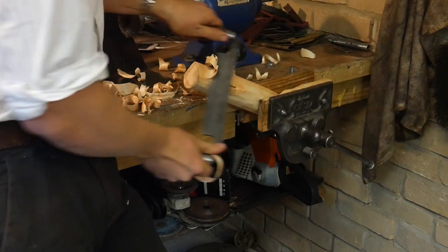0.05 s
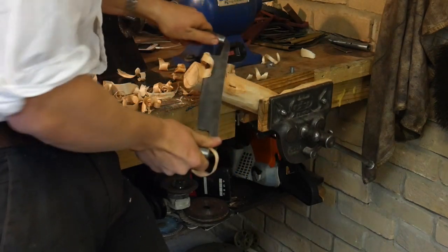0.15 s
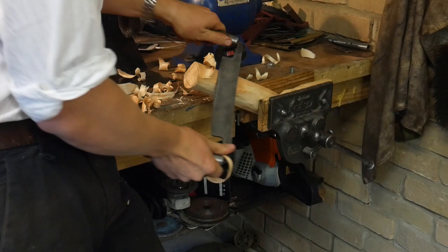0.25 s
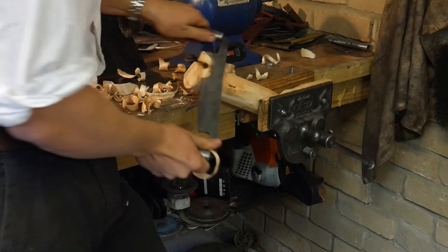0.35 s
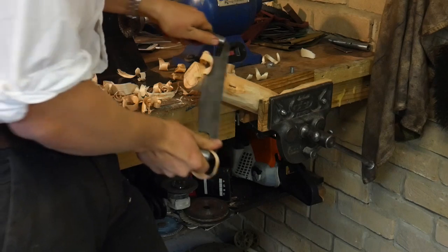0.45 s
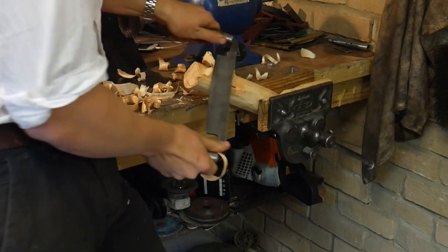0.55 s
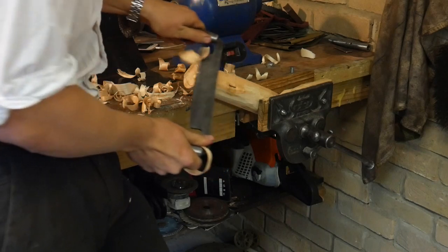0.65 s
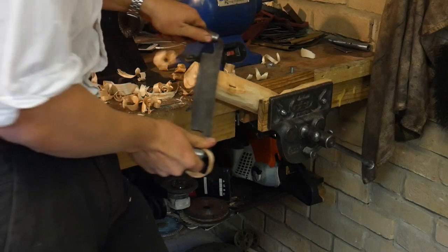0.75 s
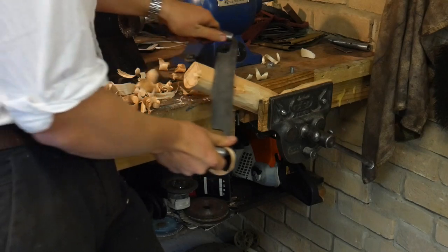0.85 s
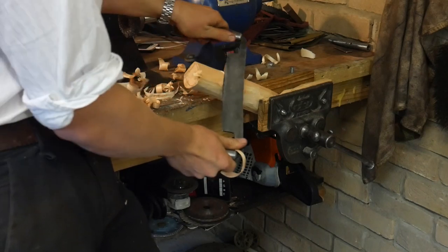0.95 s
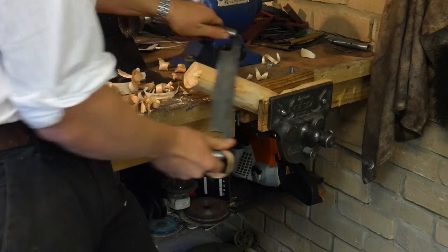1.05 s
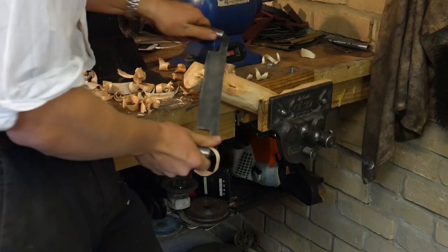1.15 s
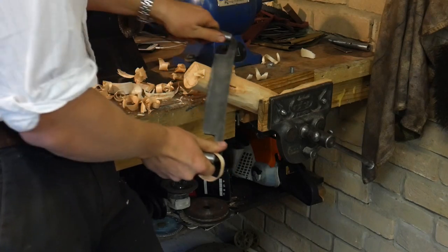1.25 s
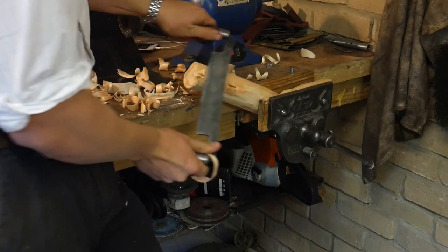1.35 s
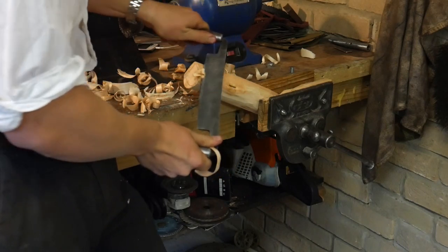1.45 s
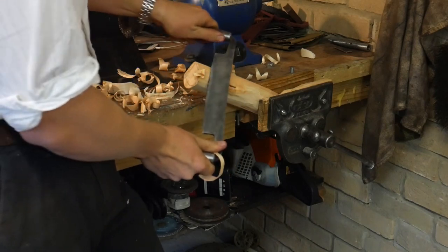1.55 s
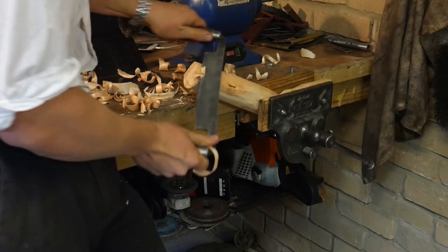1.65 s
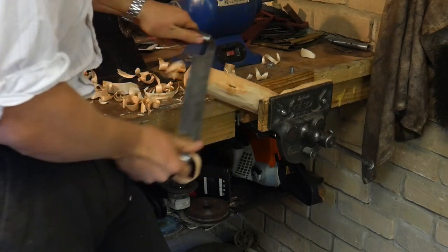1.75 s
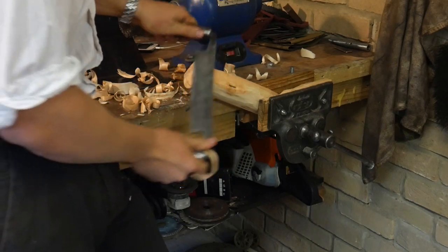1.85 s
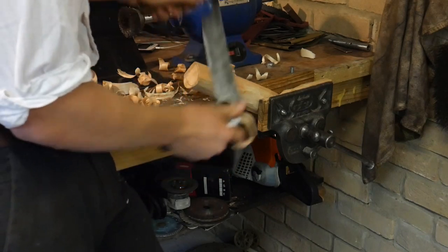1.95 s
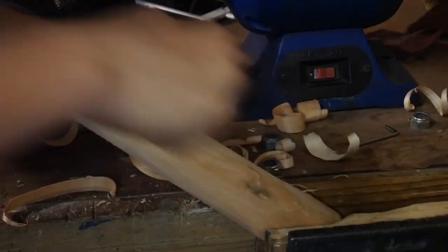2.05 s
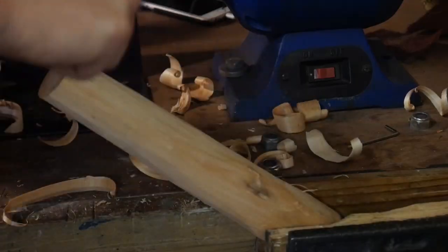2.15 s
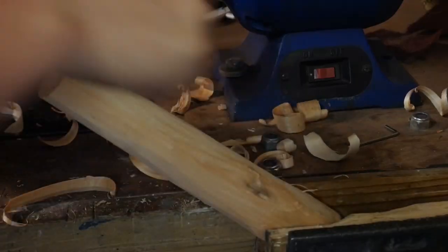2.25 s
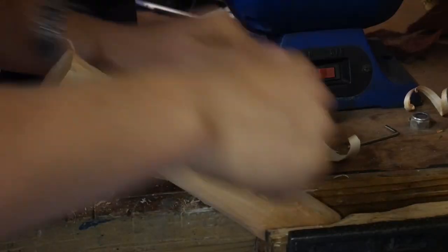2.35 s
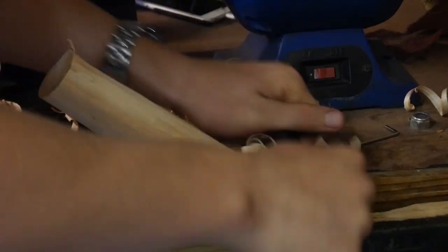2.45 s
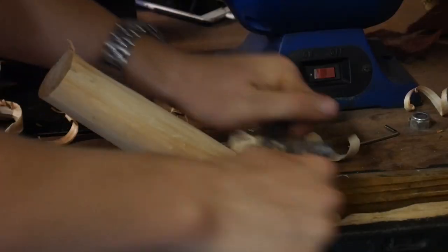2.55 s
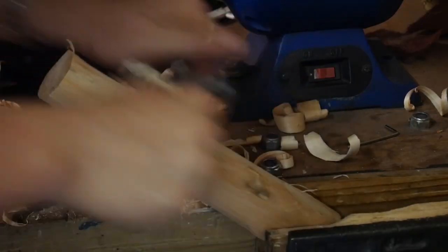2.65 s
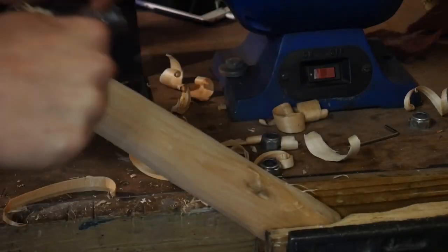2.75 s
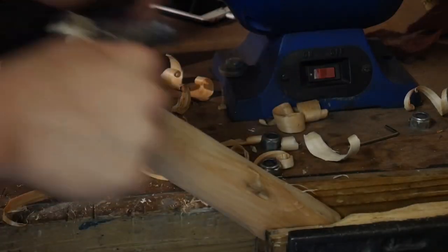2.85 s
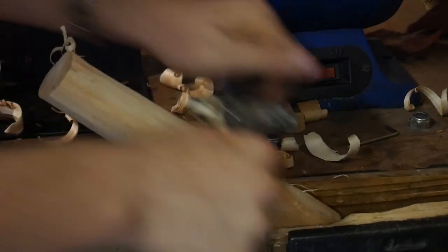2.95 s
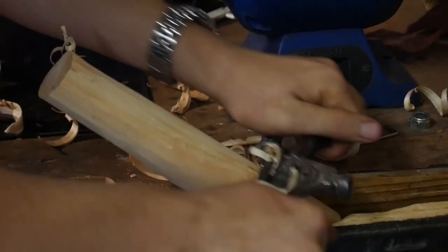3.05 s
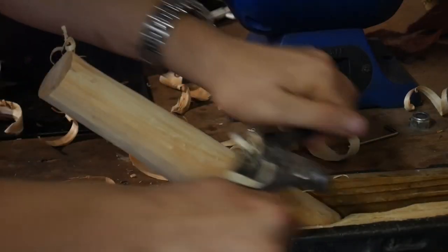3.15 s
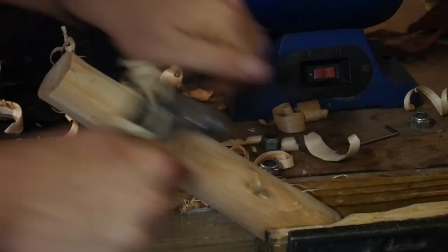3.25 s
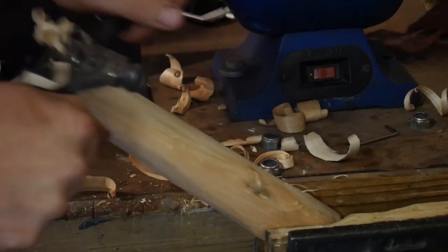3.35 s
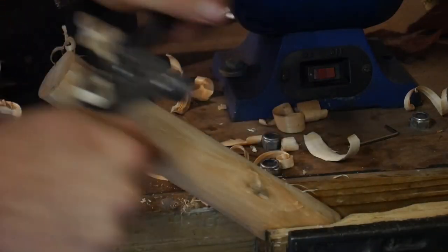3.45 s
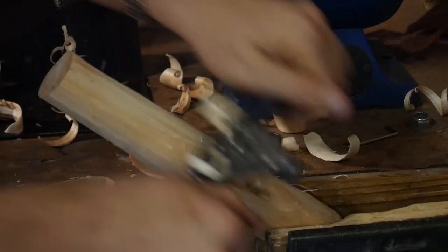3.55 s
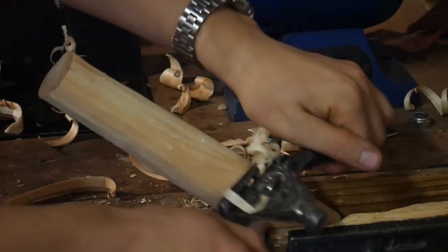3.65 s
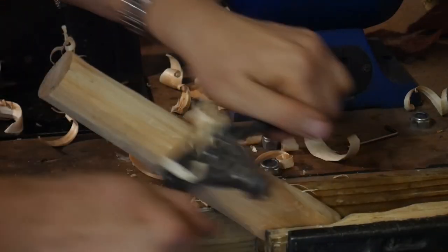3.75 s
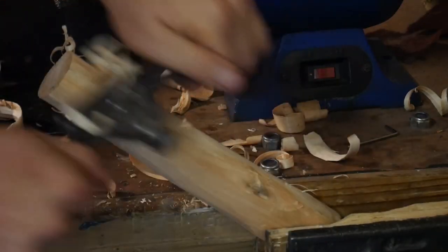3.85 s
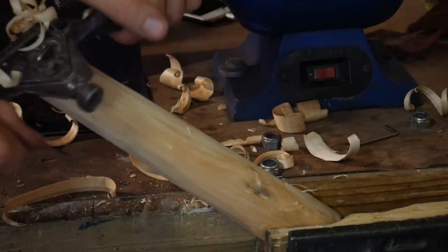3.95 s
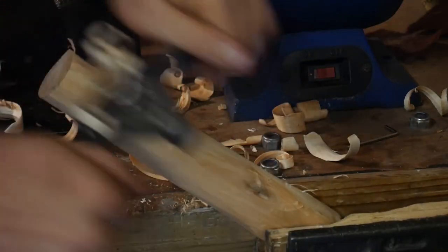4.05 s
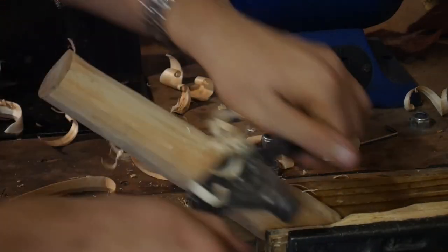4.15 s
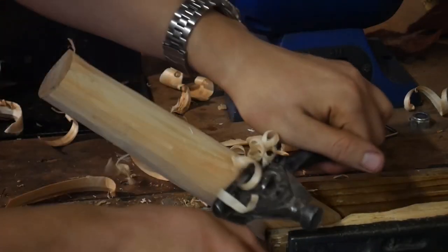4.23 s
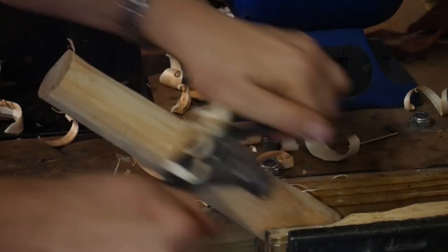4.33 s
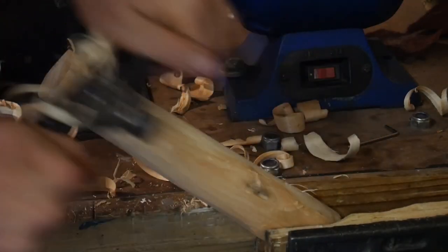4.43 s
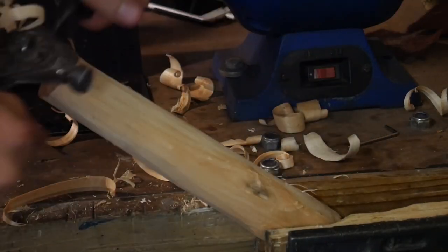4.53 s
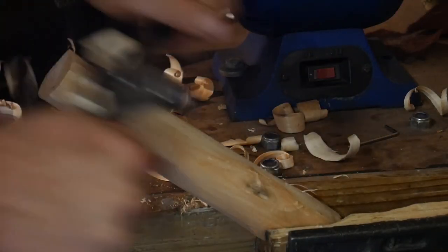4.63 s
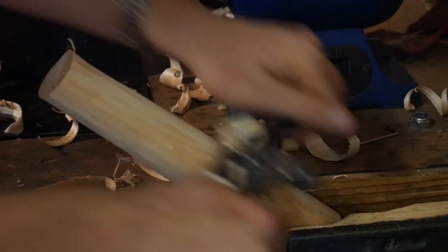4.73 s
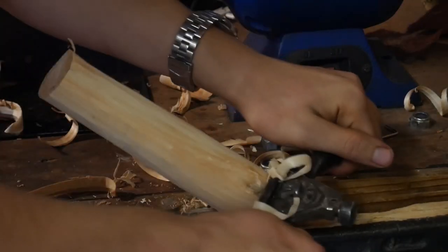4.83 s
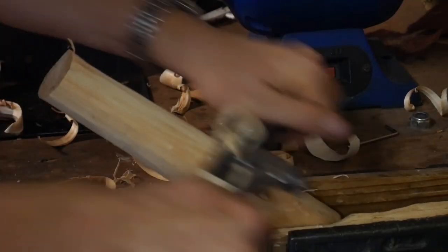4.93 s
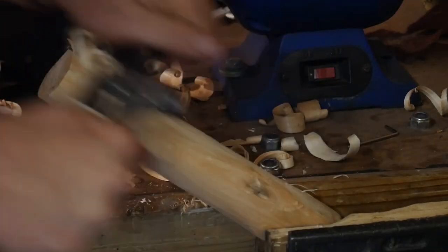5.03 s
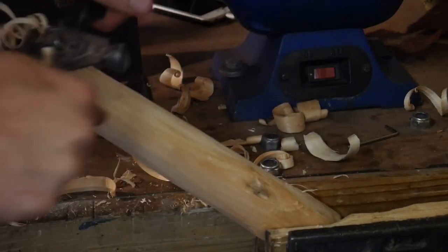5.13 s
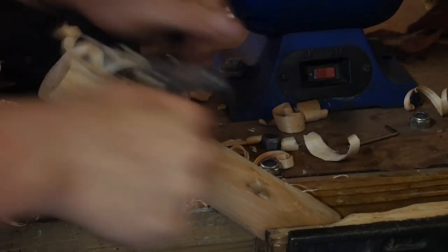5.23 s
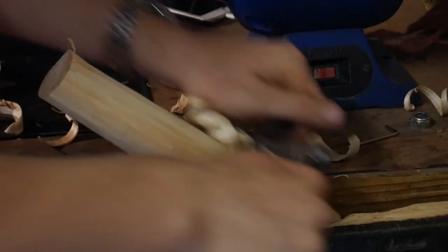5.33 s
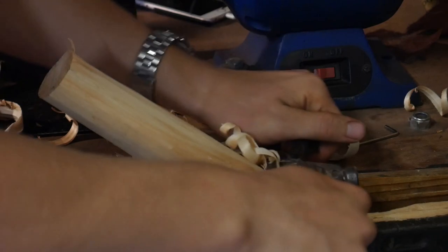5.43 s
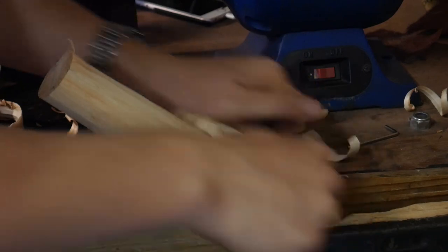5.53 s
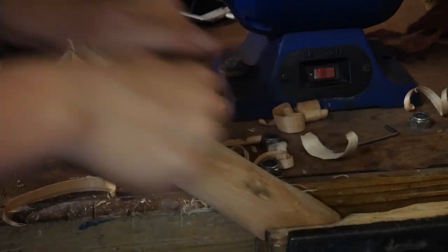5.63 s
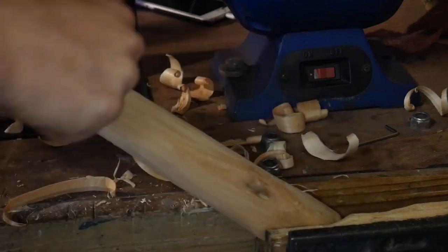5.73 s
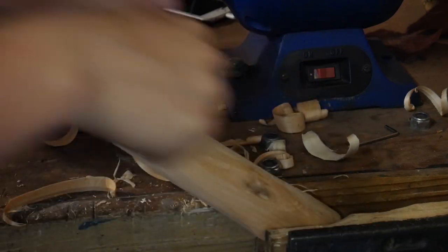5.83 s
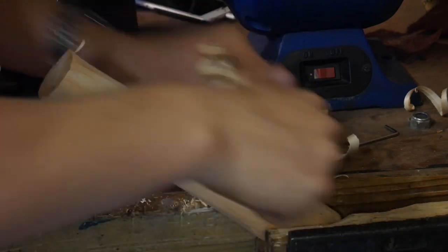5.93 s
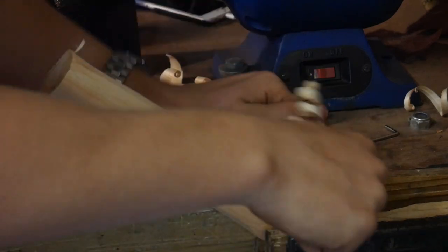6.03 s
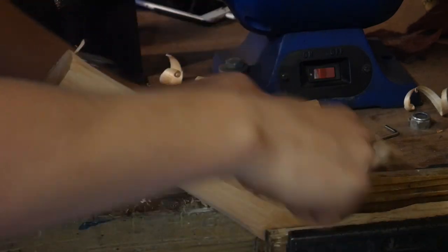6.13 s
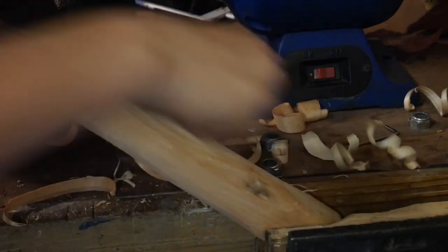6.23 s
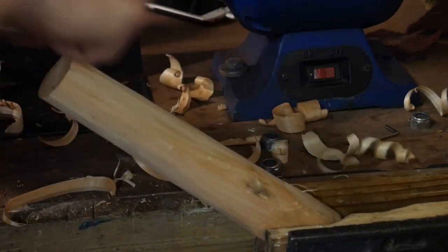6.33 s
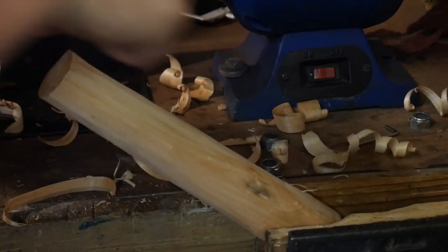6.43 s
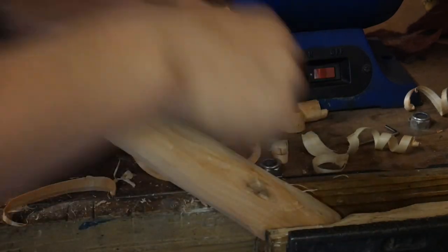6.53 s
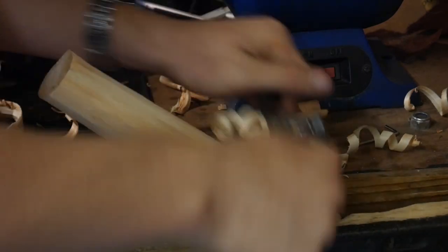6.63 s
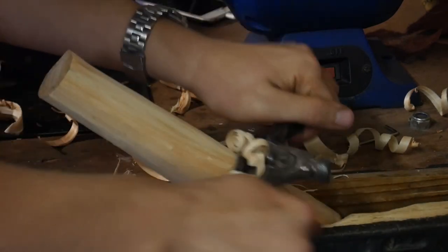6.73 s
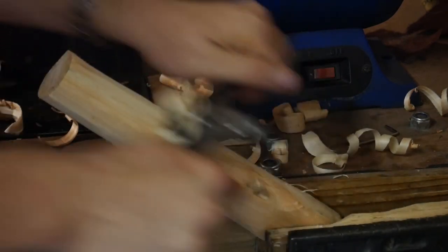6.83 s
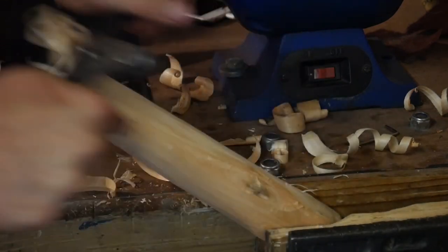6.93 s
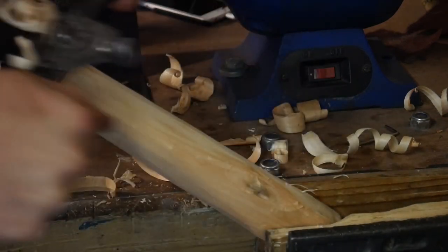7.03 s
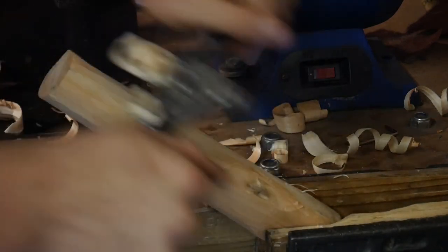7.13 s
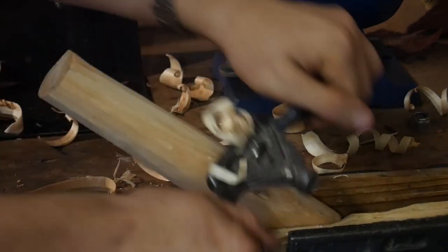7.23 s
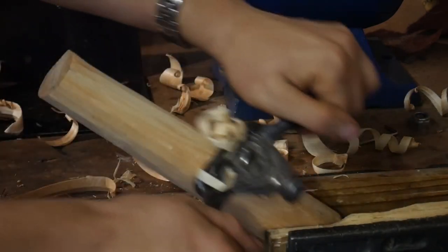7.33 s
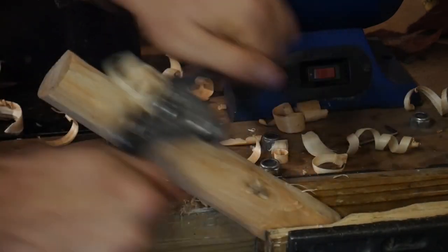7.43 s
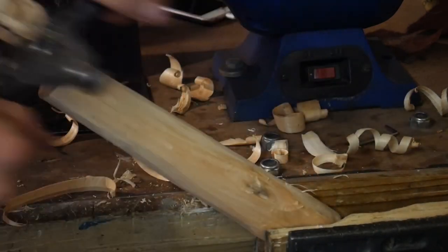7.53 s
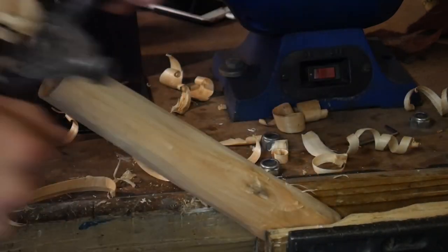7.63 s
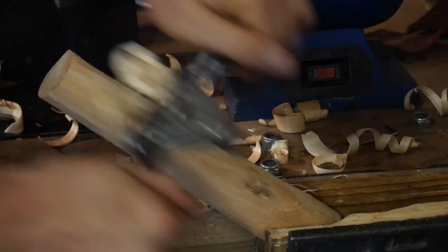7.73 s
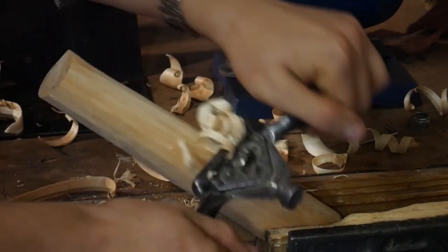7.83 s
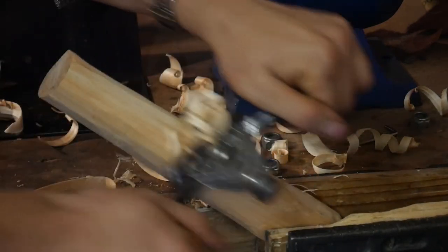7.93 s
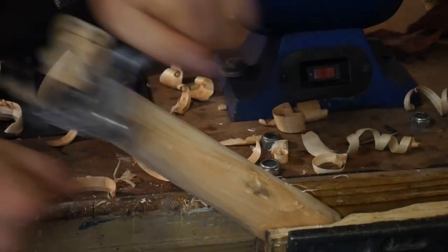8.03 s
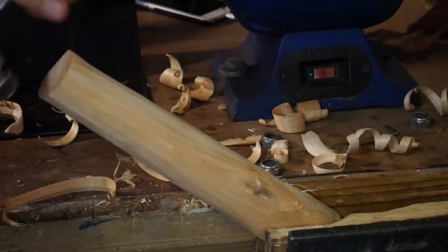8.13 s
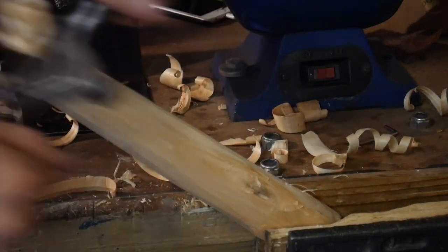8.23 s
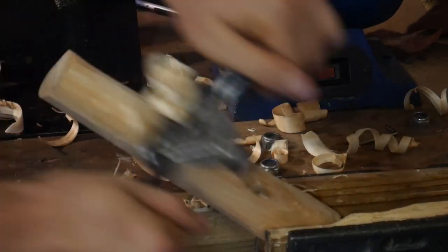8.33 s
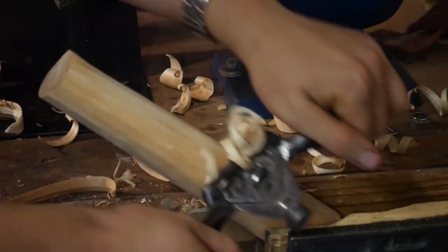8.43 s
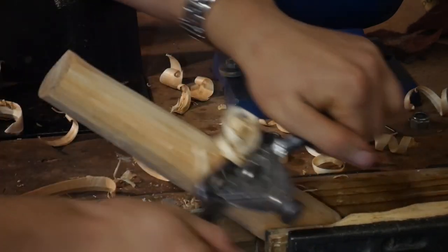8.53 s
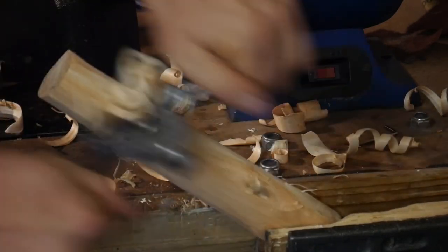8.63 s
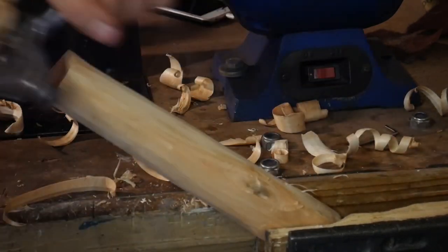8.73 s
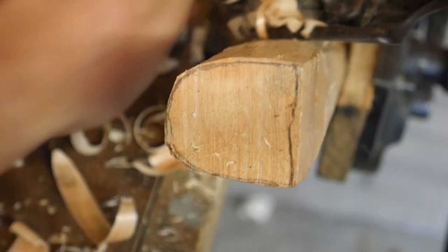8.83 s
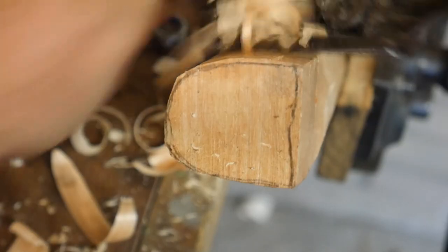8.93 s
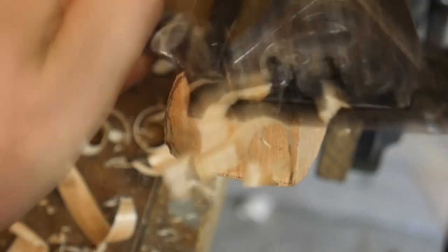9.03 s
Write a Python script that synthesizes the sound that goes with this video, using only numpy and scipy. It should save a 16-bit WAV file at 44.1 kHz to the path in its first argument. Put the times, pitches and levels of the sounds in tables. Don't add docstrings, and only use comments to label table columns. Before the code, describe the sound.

A small brick workshop. For two seconds a rasp scratches quietly and unevenly on wood a step away. Then, abruptly close and much louder, a steel shave lands with a clacking knock and pushes along a clamped wooden handle, about every six tenths of a second. Each push hisses, rings metallic and booms low in the bench, with brief brighter snaps. Short room reflections, faint air.

```python
import sys
import numpy as np
from scipy import signal
from scipy.fft import rfft, irfft, next_fast_len
from scipy.io import wavfile
from scipy.ndimage import uniform_filter1d, map_coordinates

SR = 44100
rng = np.random.default_rng(int(sys.argv[2]) if len(sys.argv) > 2 else 0)


def inscribe(sig):
    pcm = np.round(np.clip(np.atleast_2d(sig).T, -1, 1) * 32767)
    wavfile.write(sys.argv[1], SR, pcm.astype(np.int16))


def linear_from_db(decibels):
    return 10 ** (np.asarray(decibels, float) / 20)


N = 399987
TIME = np.arange(N) / SR
CLOSE_UP_S = 2.034
FORCE_STEP = 32

# bite in seconds, length in seconds, edge level in dB at the bite,
# edge level in dB at the lift, steel level in dB re the edge.
SHAVE_PUSHES = [(2.067, 0.081, -35.5, -29, 5.5), (2.665, 0.12, -32, -35, 4.5),
                (3.226, 0.15, -37, -31.5, 10), (3.825, 0.1, -33, -35.5, 11.5),
                (4.397, 0.095, -33, -29, 6.5), (4.985, 0.14, -33, -31, 10.5), (5.59, 0.15, -37.5, -30.5, 9),
                (6.202, .14, -40, -25.5, 8.5), (6.878, 0.1, -33, -29.5, 8), (7.459, 0.087, -36.5, -29, 8.5),
                (8.066, 0.066, -29.5, -35, 9), (8.619, 0.08, -50, -28, 10), (8.897, 0.11, -33.5, -29, 7)]
# start in seconds, edge level in dB, steel level in dB,
# handle level in dB, favoured handle pitch in Hz.
LANDINGS = [(2.035, -44, -29.5, -31, 275), (2.518, -33, -28.5, -22, 257.3), (3.09, -37, -21, -23.5, 247.6),
            (3.705, -35, -28, -18.5, 289.7), (4.249, -36, -32, -20, 299.6),
            (4.845, -32.5, -23, -19.5, 291.5), (5.433, -41, -62, -26.5, 255.4),
            (6.083, -42.5, -35, -27, 255), (6.762, -34.5, -37, -20.5, 262.7),
            (7.361, -39.5, -16, -17, 291.5), (7.94, -36.5, -26.5, -17, 281),
            (8.486, -42, -45, -26.5, 284.5), (8.899, -33.5, -35, -18, 261.4)]


def evened(x):
    return x / np.sqrt(np.mean(x ** 2) + 1e-20)


def read(points, hz):
    f, value = np.transpose(points)
    return np.interp(np.log(hz + 1), np.log(f + 1), value)


def coloured(x, points, share=1):
    size = next_fast_len(N)
    gain = linear_from_db(share * read(points, np.fft.rfftfreq(size, 1 / SR)))
    return irfft(rfft(x, size) * gain, size)[..., :N]


def wander(per_s):
    knots = rng.standard_normal(2000)
    coarse = TIME[::32]
    curve = map_coordinates(knots, [coarse * per_s], order=3)
    return np.interp(TIME, coarse, evened(curve))


def resonate(x, hz, width):
    r = np.exp(-np.pi * width / SR)
    feedback = [1, -2 * r * np.cos(2 * np.pi * hz / SR), r * r]
    return signal.lfilter([(1 - r * r) / 2, 0, (r * r - 1) / 2], feedback, x)


def resonate_twice(x, hz, width):
    return resonate(resonate(x, hz, width), hz, width)


def add(mix, s, sound):
    part = mix[..., round(s * SR):][..., :sound.shape[-1]]
    part += sound[..., :part.shape[-1]]


def cutting():
    # frequency in Hz, level in dB per Hz.
    rasp_tear = [(530, 1.5), (900, 0), (1070, -11.5), (1340, -6), (2730, -8), (7310, -9), (9880, -11.5),
                 (14700, -22.5), (16000, -32)]
    shave_tear = [(530, 0.5), (900, -3), (1160, -18), (1360, 1), (1990, -13.5), (2730, -7.5), (5680, -10),
                  (14500, -20.5), (15400, -22), (16000, -69)]
    # frequency in Hz, width in Hz, level in dB.
    rasp_steel = [(600, 87, 16), (862, 136, 16), (1380, 390, 12.5), (1820, 93, 11), (2050, 420, 12.5),
                  (3100, 240, 11.5), (3800, 440, -1), (6150, 170, -18)]
    shave_steel = [(1390, 38, -9), (1498, 246, 3.5), (1719, 57, -5), (1821, 124, -1.5), (1945, 83, -4),
                   (2055, 36, -2), (2184, 120, -10.5), (2360, 51, -3.5)]
    shave_edge = [(3570, 89, 0), (4217, 97, 6.5), (5540, 520, 8), (6100, 920, 15.5), (6610, 530, 2.5)]
    handle_modes = [(147.7, 23, -0.5), (198.6, 35, -8.5), (221.5, 15.7, -1.5), (265, 18.2, -0.5),
                    (292, 60, -7.5), (340.6, 28.8, -0.5), (395, 12.3, -9), (436, 13.7, -7.5),
                    (500, 42, -1.5), (601, 54, -3), (740, 185, -3.5), (794, 44, 0.5), (917, 134, -5.5)]
    bench_modes = [(65, 37, -14.5), (93.5, 26, -12), (111.1, 6, -1.5), (120, 10.3, -7.5),
                   (156.6, 2.7, -9.5)]
    # favoured Hz at the bite, at the lift.
    steel_drift = [(2000, 1200), (2050, 1800), (2150, 1680), (2050, 1720), (2050, 1560), (1990, 1800),
                   (1900, 1950), (1950, 1940), (1880, 2030), (2050, 1730), (2000, 1300), (2050, 1860),
                   (2050, 3900)]

    *levels, favoured_hz = forces()
    tear, ring, wood, boom = linear_from_db(np.array(levels))
    close = TIME > CLOSE_UP_S
    drive = fibres(7000, 1.43) * linear_from_db(0.64 * wander(90))

    edge = body(drive, shave_edge, 3.5, 8, 0.054, 0.6)
    shave_hiss = evened(coloured(drive, shave_tear)) + linear_from_db(-5.0) * edge
    rasp_hiss = evened(coloured(drive, rasp_tear))
    hiss = np.where(close, linear_from_db(2.5) * evened(shave_hiss), linear_from_db(4.0) * rasp_hiss)
    hiss = patchy(hiss) * np.std(hiss)

    ends = [(s, s + n) for s, n, *levels_db in SHAVE_PUSHES]
    steel_hz = np.interp(TIME, np.ravel(ends), np.ravel(steel_drift))
    blade = body(drive, shave_steel, 2.26, 16, 0.033, 0.11, steel_hz, lean_db=12)
    rasp = body(drive, rasp_steel, 1.5, 12, 0.03, 0.4)
    steel = np.where(close, blade, rasp)

    judder = fibres(500, 2.8)
    handle = body(judder, handle_modes, 1.43, 12, 0.045, 0.21, favoured_hz, lean_db=8)
    bench = body(judder, bench_modes, 1.3, 3.5, 0.032, 0.28)
    return tear * hiss + linear_from_db(-2.5) * ring * steel + linear_from_db(1.15) * wood * handle + linear_from_db(-0.5) * boom * bench


def fibres(per_s, spread_db):
    size = linear_from_db(spread_db * np.minimum(rng.exponential(1, N), 5))
    return size * rng.choice([-1., 1.], N) * (rng.random(N) < per_s / SR)


def patchy(x):
    z = signal.stft(x, SR, nperseg=256)[2]
    patch_bins = max(int(900 * 256 / SR), 1)
    patch_frames = max(int(0.025 * SR / 128), 1)
    luck = uniform_filter1d(rng.standard_normal(z.shape), size=patch_bins, axis=0)
    luck = evened(uniform_filter1d(luck, size=patch_frames, axis=1))
    return evened(signal.istft(z * linear_from_db(2.5 * luck), SR, nperseg=256)[1][:N])


def body(drive, modes, shift_db, per_s, hold_s, steady, favoured_hz=1000, lean_db=0):
    x = 0
    for k, (hz, width, db) in enumerate(modes):
        off_pitch_db = lean_db * abs(np.log2(hz / favoured_hz))
        share_db = db + shift_db * wander(per_s) - off_pitch_db
        mode = resonate_twice(drive, hz, 1.82 * width) / np.sqrt(width)
        x = x + (-1) ** k * linear_from_db(share_db) * mode
    hold = int(hold_s * SR)
    power = uniform_filter1d(uniform_filter1d(x ** 2, hold), hold)
    return evened(x / (abs(power) + 1e-20) ** (steady / 2))


def forces():
    rasp_pushes = [(0, 0.037, -52.5, -61, 10), (.05, 0.079, -56, -46.5, -2), (.158, 0.1, -34.5, -49, -26),
                   (.285, 0.03, -59, -51.5, -23), (.432, 0.071, -35, -44.5, -3.5),
                   (.57, 0.052, -50, -55, 2), (.7, 0.071, -40.5, -55, 2), (.9, 0.11, -52.5, -51, -6),
                   (1.148, 0.025, -48, -43, 8), (1.41, 0.054, -49.5, -44.5, 8),
                   (1.67, 0.038, -48.5, -42.5, 6), (1.8, 0.31, -55.5, -59, 1)]
    # start in seconds, length in seconds, handle level in dB,
    # bench level in dB, favoured handle pitch in Hz.
    rasp_loads = [(0, 0.02, -33.5, -35, 182), (.165, 0.054, -35, -41.5, 230),
                  (.44, 0.023, -31.5, -34.5, 278), (.55, 0.08, -38, -44, 202),
                  (.705, 0.13, -41, -39.5, 241), (.93, 0.023, -38, -46, 282),
                  (1.17, 0.077, -38.5, -41, 300), (1.46, 0.043, -32, -31.5, 198),
                  (1.55, 0.054, -39, -54, 181), (1.7, 0.07, -33, -37, 243), (1.87, 0.0092, -31.5, -44, 205)]
    shave_loads = [(2.18, 0.0071, -24.5, -31.5, 222), (2.795, 0.012, -23, -28.5, 232),
                   (3.22, 0.19, -26.5, -28.5, 261), (3.82, 0.12, -24.5, -25.5, 260),
                   (4.39, 0.13, -24, -26, 258), (4.99, 0.18, -25.5, -31.5, 248),
                   (5.73, 0.04, -25.5, -29, 296), (6.29, 0.15, -29, -26.5, 255),
                   (6.9, 0.24, -32.5, -31, 207.4), (7.45, 0.16, -28, -31.5, 280),
                   (8.1, 0.11, -27.5, -28.5, 332), (8.68, 0.11, -29, -34, 276),
                   (9.03, 0.034, -22.5, -24.5, 250)]
    # start in seconds, length in seconds, edge in dB.
    brushes = [
        (2.93, 0.1, -56),
        (4.222, 0.072, -49.5),
        (4.825, 0.038, -61),
        (5.34, 0.053, -48.5),
        (5.918, 0.065, -46.5),
        (6.064, 0.013, -52),
        (6.743, .03, -63),
    ]

    rasp_push = pushes(rasp_pushes, bite=420, lift=114, steel_bite=1900, steel_lift=162, dull_db=4.5)
    rasp_load = loads(rasp_loads, rise=300, fall=120, bench_rise=400, bench_fall=64, late_s=0.019)
    rasp = np.vstack([rasp_push, rasp_load])

    push = pushes(SHAVE_PUSHES[:-1], bite=340, lift=227, steel_bite=347, steel_lift=198, dull_db=-3)
    push = push + pushes(SHAVE_PUSHES[-1:], bite=6000, lift=280, steel_bite=6000, steel_lift=210, dull_db=6)
    load = loads(shave_loads, rise=185, fall=131, bench_rise=100, bench_fall=81, late_s=0.036)
    shave = np.vstack([push, load]) + skids()

    brush = sum(stroke(s, n, db, db, 390, 390) for s, n, db in brushes)
    shave[:2] += brush * linear_from_db([[0], [-21]])

    t = np.arange(len(brush)) * FORCE_STEP / SR
    power = np.where(t > CLOSE_UP_S, shave, rasp)
    rest_hz, rest = 178, linear_from_db(2 * -42.5)
    pitch = (power[-1] + rest * rest_hz) / (power[2] + rest)
    levels_db = 10 * np.log10(power[:-1] + 1e-12)
    return [np.interp(TIME, t, curve) for curve in [*levels_db, pitch]]


def stroke(start, length, first_db, last_db, rise, fall):
    t = np.arange(0, N + FORCE_STEP, FORCE_STEP) / SR - start
    db = first_db + (last_db - first_db) * np.clip(t / length, 0, 1)
    return linear_from_db(2 * (db + rise * np.minimum(t, 0) - fall * np.maximum(t - length, 0)))


def pushes(rows, bite, lift, steel_bite, steel_lift, dull_db):
    total = 0
    for s, n, first_db, last_db, steel_db in rows:
        edge = stroke(s, n, first_db, last_db, bite, lift)
        steel = stroke(s, n, first_db + steel_db, last_db + steel_db + dull_db, steel_bite, steel_lift)
        total = total + np.array([edge, steel])
    return total


def loads(rows, rise, fall, bench_rise, bench_fall, late_s):
    wood = np.array([stroke(s, n, db, db, rise, fall) for s, n, db, bench_db, hz in rows])
    boom = sum(stroke(s + late_s, n, db, db, bench_rise, bench_fall) for s, n, wood_db, db, hz in rows)
    favoured_hz = np.array(rows)[:, -1]
    return np.array([wood.sum(0), boom, favoured_hz @ wood])


def skids():
    out, sudden = 0, 20000
    for s, edge_db, steel_db, wood_db, hz in LANDINGS:
        edge = stroke(s, 0.00085, edge_db, edge_db, sudden, 170)
        steel = stroke(s, 0.00061, steel_db, steel_db, sudden, 620)
        wood = stroke(s, 0.025, wood_db - 10, wood_db - 3, sudden, 170)
        bench = stroke(s, 0.26, wood_db - 14.5, wood_db - 16.5, sudden, 53)
        out = out + np.array([edge, steel, wood, bench, hz * wood])
    return out


def knocks():
    # start in seconds, steel click in dB, wood knock in dB re click,
    # clack pitch in Hz, knock brightness in dB per octave.
    knock_rows = [(2.5151, -5.5, -10, 6140, -8), (3.0924, -5.5, -12.5, 5660, -4),
                  (3.704, -6.5, -10, 5400, -1.5), (4.2459, -9.5, -8.5, 5740, -13),
                  (4.8462, -5.5, -3, 5400, -0.5), (5.43, -20.5, -9, 6600, -22), (6.0783, -22, -4, 6000, -1),
                  (6.76, -7.5, -9.5, 6400, -19), (7.3611, -15.5, 8, 6000, -2.5), (7.9408, -14, 0, 4740, -6),
                  (8.4856, -24.5, 4, 4800, -18), (8.8955, -35, 3, 5860, -11)]
    # frequency in Hz, level in dB, time to fall by 90 dB in seconds.
    click_modes = [(2210, -23, 0.035), (2220, 5, 0.028), (3200, 2.5, 0.017), (4070, 2.5, 0.019),
                   (4510, -4, 0.07), (4960, 10, 0.021), (6000, 8, 0.031), (6440, -3, 0.035),
                   (8900, 5, 0.017), (12800, 1, 0.016)]
    # start in seconds, level in dB, pitch in Hz.
    thumps = [(2.185, -14, 249), (2.8, -13, 244), (3.229, -9.5, 243), (4.994, -6.5, 220), (5.009, -18, 255),
              (3.257, -15, 240), (6.385, -10.5, 144), (12, -16.5, 296), (5.752, -12.5, 600),
              (5.768, -7, 305), (6.379, -13, 265), (8.5146, -11.5, 275), (8.5015, -17, 300),
              (8.932, -21, 273), (9.037, -21, 250)]

    out, t = np.zeros((2, N)), np.arange(3000) / SR
    sides = linear_from_db(np.array([[-1.0], [1.0]]))
    for s, db, wood_db, clack_hz, tilt_db in knock_rows:
        click = linear_from_db(db - 3.0) * strike(click_modes, 0.65, 0.0051)
        crack = rng.standard_normal(3000) * np.exp(-t / 0.0026) * np.minimum(t / 0.00063, 1)
        click[:3000] += linear_from_db(db - 12.0) * crack
        clack = evened(resonate(rng.standard_normal(3000), clack_hz, 510))
        click[:3000] += linear_from_db(db - 21.0) * clack * np.exp(-t / 0.022) * np.minimum(t / 0.0005, 1)
        add(out, s, click * sides + linear_from_db(db + wood_db + 1.0) * woody(tilt_db))
    for s, db, hz in thumps:
        pair = np.sin(2 * np.pi * hz * t) + 0.28 * np.sin(2 * np.pi * 2.1 * hz * t)
        add(out, s, linear_from_db(db + 1.5) * pair * np.exp(-t / 0.0059) * np.minimum(t / 0.0022, 1))
    return out


def strike(modes, scatter_db, rattle_s):
    t = np.arange(SR // 3) / SR
    luck = rng.standard_normal((len(modes), 2))
    ring = 0
    for (hz, db, t60), (louder, sharper) in zip(modes, luck):
        level = linear_from_db(db + scatter_db * louder - 90 * t / t60)
        ring = ring + level * np.sin(2 * np.pi * hz * (1 + 0.021 * sharper) * t)
    rattle = rng.standard_normal(800) * np.exp(-t[:800] / rattle_s) * (rng.random(800) < 0.15)
    rattle[0] = 1.88
    x = signal.fftconvolve(ring, rattle)[:len(t)]
    return x / abs(x).max()


def woody(tilt_db):
    # frequency in Hz, level in dB per Hz.
    knock_colour = [(71, -38), (120, -24), (323, -2.5), (796, -0.5), (1060, -15.5), (1350, -6), (1620, -23),
                    (2010, -36), (2600, -42)]
    # frequency in Hz, t60 in seconds.
    knock_decay = [(150, 0.15), (600, 0.17), (1500, 0.12), (3000, .06)]

    t = np.arange(SR // 3) / SR
    hz = np.geomspace(130, 2600, 70) * rng.uniform(0.96, 1.02, 70)
    db = read(knock_colour, hz) + 10 * np.log10(hz) + tilt_db * np.log2(hz / 500)
    db = db + 3.5 * rng.standard_normal(70)
    turns = hz[:, None] * t + rng.random((70, 1))
    level = linear_from_db(db[:, None] - 60 * t / read(knock_decay, hz)[:, None])
    x = (level * np.sin(2 * np.pi * turns)).sum(0)
    x *= np.minimum(t / 0.0023, 1)
    return x / abs(x).max()


def swings():
    # share of its pitch as a ratio, level in dB.
    swing_modes = [(0.541, -12.5), (0.8, -4), (1, -1.5), (1.389, -8.5)]
    # start in seconds, level in dB, pitch in Hz.
    hums = [(1.17, -29, 602.4), (1.705, -29.5, 575), (2.18, -18.5, 251), (2.189, -20.5, 342.7),
            (2.176, -20.5, 154), (2.786, -27.5, 487), (2.794, -16, 220.7), (2.84, -22, 215),
            (3.705, -22, 531), (3.72, -19, 292), (4.26, -31, 558), (4.3, -23, 335), (4.422, -19.5, 253),
            (4.43, -26, 495), (4.519, -19.5, 254.5), (4.529, -25, 155), (4.845, -25, 626),
            (4.985, -21.5, 211), (5.134, -22.5, 149), (5.511, -28, 110.6), (5.49, -29, 264),
            (6.765, -26, 523), (6.77, -22.5, 264), (6.77, -36.5, 797), (7.365, -30, 704),
            (7.364, -34, 1190), (7.946, -22.5, 396), (8.0, -23, 355), (8.191, -34, 317), (7.375, -21, 281),
            (7.955, -30, 290), (8.121, -23, 301), (3.1, -19, 249), (6.295, -21, 275), (5.76, -20.5, 301),
            (8.715, -27, 513)]

    out, t = np.zeros(N), np.arange(SR // 5) / SR
    swell_s = 0.018
    swell = (t / swell_s) * np.exp(1 - t / swell_s)
    for s, edge_db, steel_db, wood_db, hz in LANDINGS:
        modes = sum(linear_from_db(db) * np.sin(2 * np.pi * share * hz * t) for share, db in swing_modes)
        add(out, s, linear_from_db(wood_db + 0.5) * modes * swell)
    for s, db, hz in hums:
        add(out, s, linear_from_db(db) * np.sin(2 * np.pi * hz * t) * swell)
    return out


def snaps_and_squeaks():
    # start in seconds, level in dB, pitch in Hz.
    snaps = [(0.159, -16, 4700), (0.29, -24, 4640), (0.3485, -22, 10500), (0.431, -12.5, 7450),
             (0.571, -26, 4540), (1.1468, -18, 2480), (.112, -24, 7400), (.204, -21, 9000), (.4, -32, 3500),
             (1.642, -32, 5000), (1.888, -32, 8950), (4.185, -36, 7000), (4.9856, -26, 3500),
             (5.352, -30, 6800), (5.891, -34, 9200), (6.0646, -31, 4900), (8.934, -9, 6000),
             (8.983, -10, 6100), (1.239, -18.5, 9000), (3.2162, -13, 5270), (3.373, -13, 3070),
             (3.816, -23, 3630), (4.3796, -12, 2500), (4.815, -35, 2000), (5.3333, -37, 3460),
             (5.5588, -25, 5800), (5.7534, -5.5, 1010), (6.2654, -20, 2500), (6.296, -4, 4170),
             (8.066, -28, 3100), (8.1283, -12.5, 5400), (8.77, -16, 6000)]
    # start in seconds, level in dB, pitch in Hz.
    squeaks = [(0.046, -36, 7360), (0.2588, -35, 7400), (0.5152, -40, 7250), (1.5277, -33.5, 7320),
               (1.817, -37, 7430), (4.06, -41, 7400), (4.598, -35, 7300), (5.1766, -50, 7260),
               (6.4852, -40, 7440), (7.6505, -39, 7130), (8.1738, -31, 7200)]

    out, t = np.zeros(N), np.arange(3500) / SR
    for s, db, hz in snaps:
        burst = evened(resonate_twice(rng.standard_normal(len(t)), hz, hz))
        add(out, s, linear_from_db(db - 13) * burst * np.exp(-t / 0.005) * np.minimum(t / 0.0006, 1))
    for s, db, hz in squeaks:
        whistle = evened(resonate_twice(rng.standard_normal(len(t)), hz, 260))
        add(out, max(s - 0.01, 0), linear_from_db(db) * whistle * (t / 0.019) * np.exp(-t / 0.012))
    return out


def sings(rows, sharper=0):
    out = np.zeros(N)
    lead = 2000
    for s, n, db, hz, width in rows:
        t = np.arange(-lead, SR // 3) / SR
        grit = rng.standard_normal(len(t)) ** 3
        tone = evened(resonate_twice(grit, hz, width))
        rise, fall = 1340 + sharper * hz, 430
        level = linear_from_db(db + rise * np.minimum(t, 0) - fall * np.maximum(t - n, 0))
        skip = max(lead - round(s * SR), 0)
        add(out, max(s - lead / SR, 0), (tone * level)[skip:])
    return out


def walls(x):
    # frequency in Hz, t60 in seconds.
    wall_decay = [(100, 0.032), (500, 0.47), (950, 0.43), (2000, 0.24), (6000, 0.19), (14000, 0.04)]
    # frequency in Hz, level in dB.
    wet = [(40, -14), (120, -7), (250, -16.5), (1000, -4.5), (4000, -9), (9000, -2.5), (14000, -4.5)]

    taps = np.zeros((2, SR // 2))
    at = np.arange(200, SR // 2 - 20, 20)
    at = at + rng.integers(0, 20, (2, len(at)))
    np.put_along_axis(taps, at, rng.choice([-1., 1.], at.shape), 1)
    hz, t, z = signal.stft(taps, SR, nperseg=512)
    z = z * linear_from_db(-60 * t / read(wall_decay, hz)[:, None])
    band_power = (abs(z) ** 2).sum(2).mean(0)
    z /= np.sqrt(uniform_filter1d(band_power, size=9))[:, None]
    tail = signal.istft(z, SR, nperseg=512)[1]
    tail = tail / np.linalg.norm(tail[0])
    return coloured(signal.fftconvolve(x[None], tail, axes=1)[:, :N], wet)


def air_floor():
    # frequency in Hz, level in dB per Hz.
    air_colour = [(18, -28), (30, -26), (100, -38), (134, -6.5), (569, -11.5), (1070, -21), (7270, -33),
                  (14400, -42), (16000, -65.5)]
    shared, left, right = rng.standard_normal((3, N))
    air = np.array([shared + 1.1 * left, shared + 0.85 * right])
    return linear_from_db(-49.5) * evened(coloured(air, air_colour))


def scene():
    # start in seconds, length in seconds, level in dB, pitch in Hz, width in Hz.
    singing = [(.01, 0.092, -50, 1910, 250), (0.293, 0.027, -52, 4500, 700),
               (0.348, 0.027, -48, 6200, 1500), (0.567, 0.036, -53, 4400, 900),
               (0.594, .03, -55, 6700, 400), (1.147, .05, -48, 4070, 250), (1.15, .05, -51, 6100, 400),
               (1.241, 0.032, -46.5, 6400, 2500), (1.405, 0.048, -51, 4100, 200),
               (1.409, .05, -51, 6150, 300), (8.486, 0.006, -50, 12800, 900), (1.648, .04, -60, 5040, 1500),
               (1.67, 0.038, -53, 4200, 250), (1.687, 0.036, -52, 7400, 400),
               (1.713, 0.033, -55, 6240, 300), (1.793, 0.1, -58, 7400, 400), (3.101, 0.028, -30, 802, 79),
               (3.367, 0.047, -31.5, 680, 300), (4.848, 0.05, -46, 1450, 120),
               (4.864, 0.032, -40, 4700, 302), (4.0, 0.16, -38, 161, 25), (5.575, 0.15, -37, 799, 40),
               (5.648, 0.044, -28, 353, 39.5), (5.65, 0.057, -29, 265, 30), (6.09, 0.049, -36, 261, 50),
               (6.22, 0.041, -35, 806, 50), (6.287, 0.1, -26, 269, 35), (6.35, 0.032, -30, 808, 70),
               (8.488, 0.0059, -36, 4780, 500), (8.487, 0.01, -43, 8800, 500),
               (8.552, 0.034, -28.5, 342, 60.3), (8.82, 0.034, -49, 7260, 60),
               (8.92, 0.065, -32, 5970, 500)]
    surges = [(0.93, .06, -53.5, 2500, 600), (2.046, 0.068, -31, 1950, 500),
              (2.658, 0.036, -36.5, 2000, 450), (3.212, 0.02, -38, 2150, 500),
              (3.284, 0.14, -35, 1960, 350), (3.814, 0.028, -43, 2050, 600), (4.433, 0.081, -29, 2050, 400),
              (5.007, 0.066, -28.5, 2050, 300), (5.098, 0.023, -29, 2050, 500),
              (5.687, 0.062, -26.5, 1950, 250), (5.895, 0.12, -59.5, 10800, 4900),
              (5.94, 0.019, -47, 11200, 3950), (6.266, 0.026, -25.5, 1915, 300),
              (6.773, .05, -48, 6000, 1500), (6.877, 0.027, -28, 1920, 350), (7.51, 0.04, -38, 1950, 400),
              (7.367, 0.044, -34.5, 1000, 700), (8.065, 0.02, -32, 2000, 300), (8.604, .1, -46, 2000, 300),
              (8.951, 0.061, -27.5, 2150, 404)]
    rattles = [
        (4.029, .028, -53, 7300, 250),
        (4.029, 0.028, -64, 11000, 300),
        (4.062, .003, -57, 8000, 5000),
        (8.33, .02, -61, 5470, 800),
        (7.088, .03, -40, 940, 120),
        (8.22, 0.052, -63, 7300, 200),
        (8.27, 0.15, -46, 500, 450),
    ]

    near = cutting() + snaps_and_squeaks() + swings() + knocks()
    near = near + sings(singing, sharper=0.9) + sings(surges)
    return near + walls(near.mean(0)) + air_floor() + sings(rattles, sharper=0.9)


def band_limit(x):
    return signal.sosfilt(signal.butter(12, 16100, fs=SR, output="sos"), x)


def record(dry):
    # frequency in Hz, tilt in dB, taken 0.21 times left and -2 times right.
    tilt = [(60, -1), (130, -0.5), (290, 0.5), (640, 0.5), (1410, 0), (3100, -0.5), (6820, -1), (15000, 2)]
    # frequency in Hz, level in dB.
    mic = [(20, -24), (45, -16), (65, -3.5), (13000, -1.5), (14800, -5.5), (15400, -10), (16600, -40)]

    left = coloured(dry[0], tilt, 0.21)
    right = coloured(dry[1], tilt, -2.0)
    x = coloured(np.array([left, right]), mic)
    x = signal.lfilter(*signal.iirnotch(7890, 60, SR), x)
    return band_limit(x)


dry = scene()
out = record(dry)
inscribe(out)
```